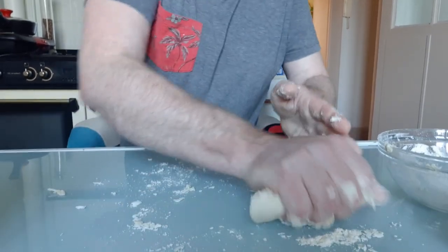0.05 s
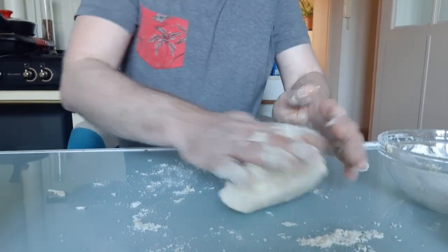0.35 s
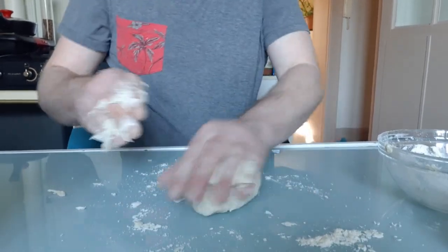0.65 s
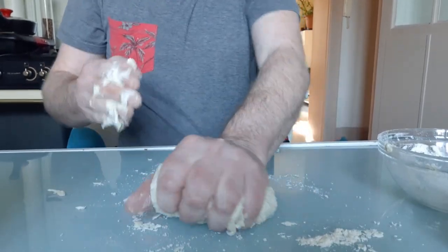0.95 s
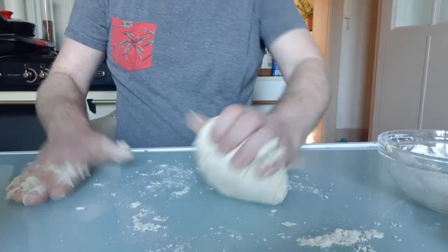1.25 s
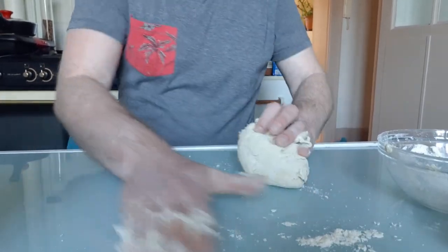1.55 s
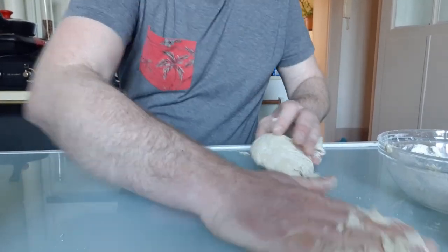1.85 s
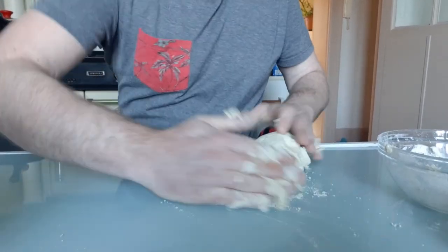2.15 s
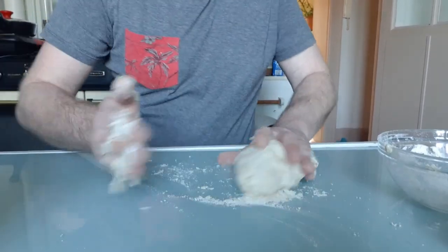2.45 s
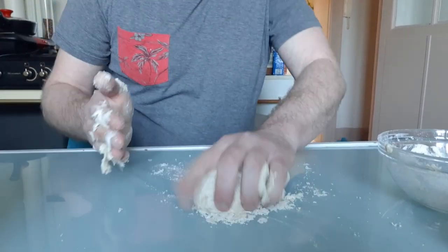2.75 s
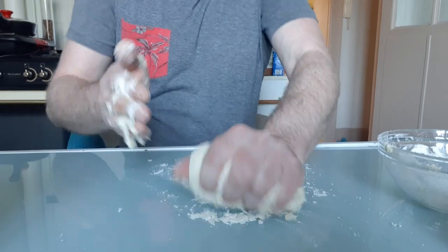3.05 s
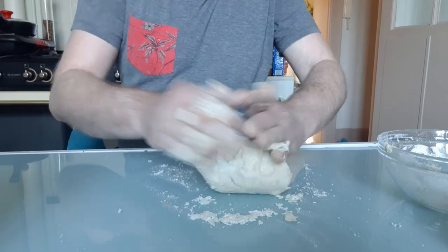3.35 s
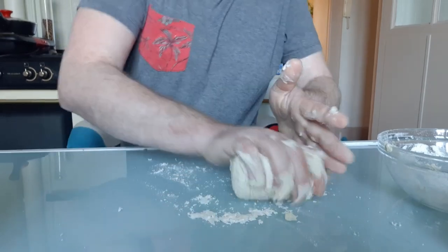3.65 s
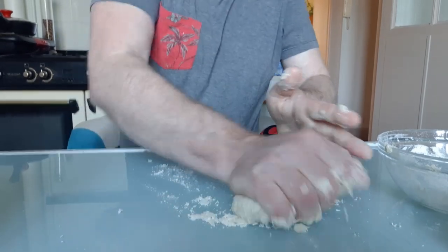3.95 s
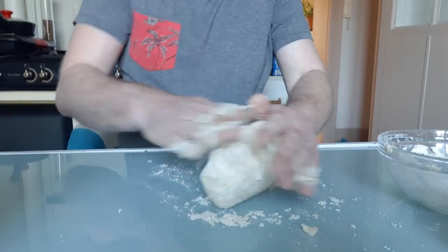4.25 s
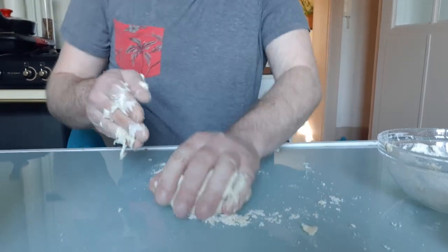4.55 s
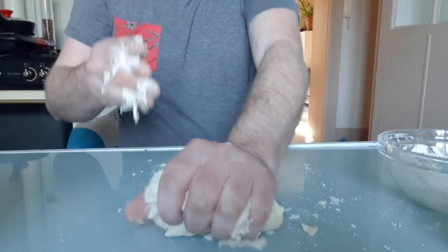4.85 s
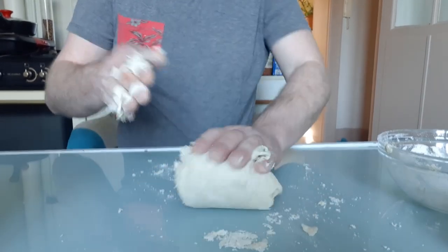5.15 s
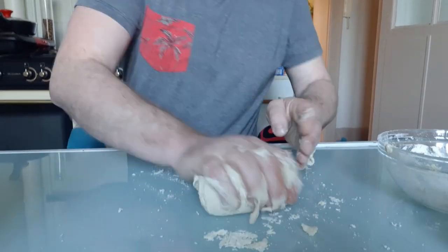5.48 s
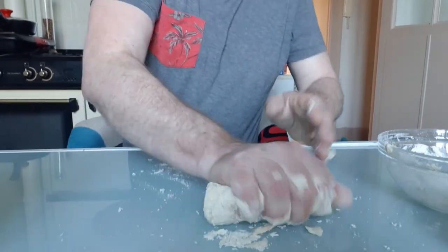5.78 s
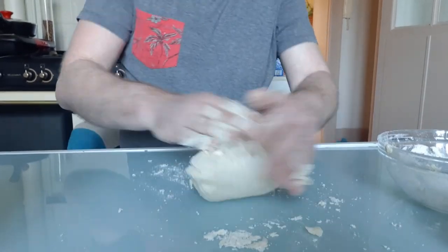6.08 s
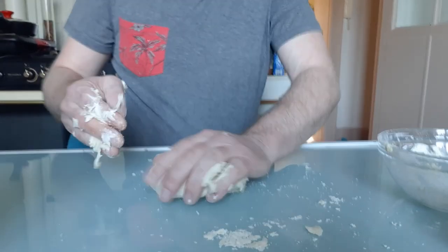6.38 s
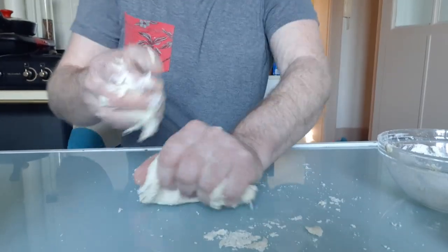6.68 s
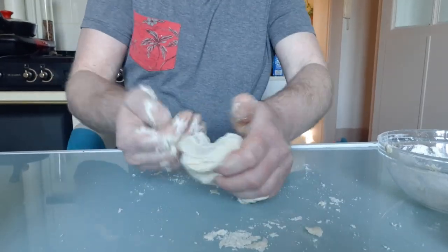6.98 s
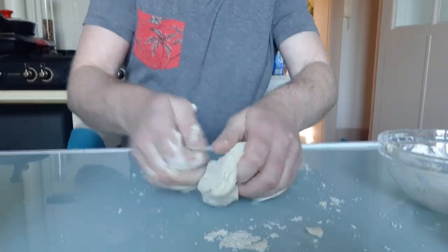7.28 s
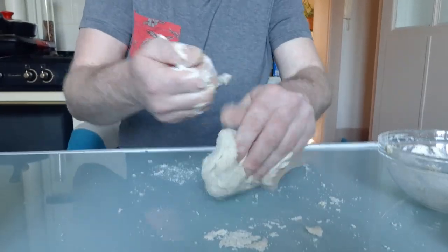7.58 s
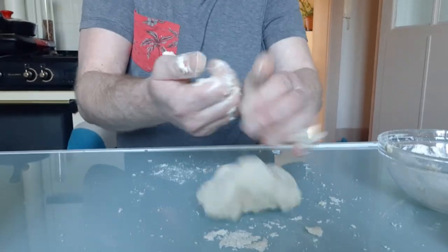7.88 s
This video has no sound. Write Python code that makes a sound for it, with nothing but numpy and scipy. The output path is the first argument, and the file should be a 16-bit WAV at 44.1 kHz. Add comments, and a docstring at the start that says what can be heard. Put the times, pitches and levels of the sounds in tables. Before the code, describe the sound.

In a small, slightly echoing kitchen with a low hum, dough is worked by hand on a glass table, heard in stereo with the bass leaning left. Soft pats and pressing give way to a faint hiss of swept flour. Firmer slaps, dull thuds and sticky peeling follow about once a second, with a few tiny squeaks of trapped air. A heavy slam, the loudest sound, comes near the end.

```python
"""Dough is kneaded by bare hands on a glass tabletop: palms slap, the lump thuds, peels and is rolled,
and near the end it is slammed down on a cushion of air. Each impact excites the pane's low, damped modes.
Friction makes the pressed lump murmur and loose flour hiss under a sweeping hand, and trapped air
squeaks out of a fold. The hard walls of a small kitchen reverberate, over a quiet room hum."""
import sys
import numpy as np
from scipy import signal
from scipy.fft import rfft, irfft, next_fast_len
from scipy.io import wavfile
from scipy.ndimage import map_coordinates

SR = 44100
rng = np.random.default_rng(int(sys.argv[2]) if len(sys.argv) > 2 else 0)


def digitize_waveform(pressure):
    """Quantize a signal to 16-bit integers and store it at the path in sys.argv[1].

    Rows of a 2-D input are taken as channels; values are limited to [-1, 1].
    """
    field = np.atleast_2d(pressure).T
    bounded = np.clip(field, -1, 1)
    quanta = np.round(bounded * 32767).astype(np.int16)
    wavfile.write(sys.argv[1], SR, quanta)


N = 353680

# Coherence of the left and right sound fields: frequency_hz, correlation
COHERENCE = [(60, 0.95), (150, 0.75), (300, 0.89), (550, 0.29), (1200, 0.15), (15000, 0.34)]
# Reverberation time of the kitchen: frequency_hz, t60_s
ROOM_DECAY = [(70, 0.6), (250, 0.55), (700, 0.34), (2400, 0.46), (5000, 0.34), (9000, .31), (15000, 0.31)]
# Spectra of room hum, flour hiss, palm rub and flesh meeting dough: frequency_hz, density_db
HUM_SPECTRUM = [(25, -27.5), (90, -1.5), (156, -9.5), (205, -5), (290, -0.5), (400, -14.5), (525, -7),
                (740, -10), (1020, -18.5), (1500, -27), (3000, -42), (4600, -35.5), (9000, -42),
                (15500, -38)]
FLOUR_SPECTRUM = [(1500, -21), (3500, -1.5), (5500, -1.5), (9000, 4), (13000, 9), (16000, -2.5)]
PALM_SPECTRUM = [(400, -3.5), (900, -8.5), (1700, -3.5), (4000, -3.5), (7500, -6), (10000, -22.5),
                 (14000, -12.5)]
SLAP_SPECTRUM = [(25, -17), (70, 0), (150, 0), (300, -3.5), (550, -3), (800, -0.5), (1500, -1.5),
                 (2500, -2), (4000, -1), (6300, -3), (9000, -8), (13000, -11.5), (16000, -19)]
# The dough slides on floury glass, and the hand leans on it: peak_s, length_s, level_db
DOUGH_SLIDES = [(.01, 0.13, -57.5), (.26, .4, -73.5), (.83, 0.17, -69.5), (3.17, 0.15, -66.5),
                (3.8, 0.59, -66), (4.03, 0.33, -67.5), (4.86, 0.37, -68.5), (5.35, 0.077, -71.5),
                (5.89, 0.37, -69.5), (6.27, 0.16, -71), (7.75, 0.27, -79.5)]
HAND_PRESSES = [(.14, 0.22, -45), (.42, 0.46, -45.5), (1.26, 0.48, -51), (1.82, 0.34, -43.5),
                (2.12, 0.44, -53), (2.46, 0.33, -49), (4.08, 0.36, -47), (5.92, 0.54, -46),
                (6.78, 0.44, -57)]
# The flat hand sweeps flour out and back, then gathers it: time_s, level_db
FLOUR_SWEEP = [(1.28, -91), (1.344, -69.5), (1.52, -55.5), (1.836, -54.5), (1.898, -60), (2.02, -49.5),
               (2.176, -70.5), (2.29, -95), (2.324, -77), (2.534, -50), (2.584, -52.5), (2.65, -81)]
# Bending modes of the pane on its frame: pitch_hz, level_db, t60_s
PANE_MODES = [(59.6, -14, 0.37), (80.34, -3.5, 0.39), (111.7, 0, 0.24), (130.7, -5.5, 0.2),
              (154.4, -8.5, 0.36), (207.3, -5, 0.51), (236.6, -9, 0.29), (277, -13.5, 0.77),
              (297.2, -2.5, 0.25), (343.6, -11.5, 0.24), (373, -22, 0.11), (405.4, -18.5, 0.46),
              (479.8, -6.5, 0.32), (536.3, -1.5, 0.34), (602.5, -7.5, 0.215), (727, -16.5, 0.15),
              (812, -8.5, .3), (987, -31.5, .3), (1127, -15.5, 0.29), (1550, -21, 0.18)]
# The table's bass is stronger on the left: frequency_hz, left_minus_right_db
TABLE_BALANCE = [(40, -1.5), (75, 10), (120, 5), (230, 1.5), (1000, 0)]
# Palm slaps, thuds of the lump, and gentle lifts or landings: start_s, level_db, spot_hz
# (spot_hz is the frequency at which the pane yields most under the point of contact)
PALM_SLAPS = [(.3702, -32, 208), (.6481, -40.5, 208), (2.689, -26.5, 227), (2.731, -21.5, 78.6),
              (3.219, -37, 204), (3.557, -26.5, 244), (3.5924, -27.5, 232), (4.965, -38, 250),
              (5.105, -34, 218), (5.464, -27.5, 244), (5.564, -25, 293), (6.295, -18.5, 131),
              (6.346, -14.5, 82), (7.1703, -25, 113.6), (7.1754, -10, 112), (7.187, -12, 113),
              (7.2022, -16.5, 108)]
LUMP_THUDS = [(.079, -56, 229), (.7564, -56, 134), (2.8157, -38, 204), (2.853, -50.5, 125),
              (3.109, -61, 198), (3.664, -27.5, 298), (3.691, -35, 298), (4.525, -45, 550),
              (4.566, -43.5, 152), (5.5347, -37.5, 140), (6.3805, -38, 82.7), (6.4597, -41.5, 113),
              (7.178, -28, 135), (7.3795, -54, 210)]
LUMP_NUDGES = [(1.305, -68, 81), (2.303, -71.5, 104)]
# Sticky dough peels off skin or glass: start_s, level_db
DOUGH_PEELS = [(.174, -40), (0.965, -64), (1.056, -40.5), (3.031, -41), (3.765, -34.5), (3.958, -39.5),
               (4.869, -40), (6.7, -45.5)]
# The four bands of a contact's force spectrum: thud_hz, pat_hz, smack_hz, fizz_hz
BANDS_HZ = [130, 420, 2400, 10000]
# Timbre of each kind of contact in those bands: thud_db, pat_db, smack_db, fizz_db
SLAP_TIMBRE = [-8.5, -9, 0, -29]
THUD_TIMBRE = [-5, 3, 0.5, -28.5]
PEEL_TIMBRE = [-16.5, -10, 0.5, -14.5]
NUDGE_TIMBRE = [1, 0.5, -2, -4]
# Air squeezed out of a fold: start_s, length_s, pitch_hz, bandwidth_hz, level_db
FOLD_SQUEAKS = [(3.763, 0.023, 860, 350, -36), (5.5, .12, 2260, 800, -41), (5.558, 0.041, 833, 131, -35)]
# Air displaced by the falling lump at the slam: centre_s, frequency_hz, level_db
AIR_PUFFS = [(7.167, 237, -12.5), (7.173, 200.7, -20)]


def amp(db):
    """Amplitude ratio of a level in decibels."""
    return 10 ** (np.asarray(db) / 20)


def unit(x):
    """The signal normalised to rms 1."""
    return x / np.sqrt(np.mean(x ** 2) + 1e-20)


def along(points, hz):
    """Interpolation of (frequency_hz, value) points on a logarithmic frequency axis."""
    knots_hz, values = np.transpose(points)
    return np.interp(np.log(hz + 1), np.log(knots_hz + 1), values)


def wobble(rate_hz):
    """Smooth random modulation: a spline through Gaussian knots."""
    knots = rng.standard_normal(int(N * rate_hz / SR) + 4)
    return map_coordinates(knots, [np.arange(N) * rate_hz / SR])


def filtered(x, response):
    """Linear filtering: the spectrum is multiplied by a frequency response."""
    n = x.shape[-1]
    padded = next_fast_len(n + 8192)
    return irfft(rfft(x, padded) * response(np.fft.rfftfreq(padded, 1 / SR)), padded)[..., :n]


def noise(n, spectrum_db):
    """Partially coherent stereo noise: the channels are alike in the bass, much less so in the treble."""
    def mid_side_gains(hz):
        angle = np.arccos(np.clip(along(COHERENCE, hz), -1, 1)) / 2
        return amp(spectrum_db(hz)) * [np.cos(angle), np.sin(angle)]
    mid, side = filtered(rng.standard_normal((2, n)), mid_side_gains)
    return np.array([mid + side, mid - side])


def steady_noise(spectrum):
    """Stationary stereo noise of rms 1 with a tabulated spectrum."""
    return unit(noise(N, lambda hz: along(spectrum, hz)))


def add(track, start_s, sound):
    """Superposition of a sound on the track."""
    part = track[:, max(round(start_s * SR), 0):][:, :sound.shape[-1]]
    part += sound[..., :part.shape[1]]


def strokes(rows, swell_share=0.61):
    """Envelope of strokes that swell and fade; incoherent sounds add in power."""
    t, power = np.arange(N) / SR, np.zeros(N)
    for peak_s, length_s, db in rows:
        start_s = peak_s - swell_share * length_s
        ramp = np.interp(t, [start_s, peak_s, start_s + length_s], [0, 1, 0])
        speed = np.sin(np.pi / 2 * ramp) ** 2
        power += (amp(db) * speed) ** 2
    return np.sqrt(power)


def reverberate(x, wet_db, build_s=0.0013):
    """Reverberation: diffuse reflections build up quickly, then decay at a different rate in each band."""
    hz, t, bands = signal.stft(noise(SR * 2 // 3, np.zeros_like), SR, nperseg=256)
    decay = amp(-60 * t / along(ROOM_DECAY, hz)[:, None])
    tail = signal.istft(bands * decay * (1 - np.exp(-t / build_s)), SR, nperseg=256)[1]
    tail = tail / np.linalg.norm(tail[0])
    return x + amp(wet_db) * signal.fftconvolve(x, tail, axes=1)[:, :x.shape[1]]


def room_hum(level_db=-54):
    """Ambient noise: a stationary hum with most of its power at low frequencies."""
    return amp(level_db) * steady_noise(HUM_SPECTRUM)


def flour_friction(sweep_db=1, rub_db=-54, brisk_db=-57, rub_exponent=0.77):
    """Granular friction: flour hisses in tiny bursts; the palm's duller rub grows more slowly with speed."""
    time_s, level_db = np.transpose(FLOUR_SWEEP)
    sweep = amp(sweep_db + np.interp(np.arange(N) / SR, time_s, level_db, left=-np.inf, right=-np.inf))
    motion = sweep + strokes(DOUGH_SLIDES)
    hiss = steady_noise(FLOUR_SPECTRUM) * motion
    rub = steady_noise(PALM_SPECTRUM) * (motion / amp(brisk_db)) ** rub_exponent * amp(rub_db)
    grit = unit(amp(2.4 * wobble(rate_hz=700) + 1.84 * wobble(rate_hz=28)))
    return reverberate(grit * (hiss + rub), wet_db=-0.5)


def pressing(lumpy_db=2, relative_half_width=0.035):
    """Stick-slip friction: the lump, rolled under the hand, drives the pane's low modes into a murmur."""
    def resonance_db(hz):
        power = sum(amp(2 * db) / (1 + ((hz / mode_hz - 1) / relative_half_width) ** 2)
                    for mode_hz, db, _ in PANE_MODES)
        return 10 * np.log10(power)
    # Spectrum of the friction force: frequency_hz, density_db
    drive = [(25, -1), (70, 5.5), (110, -3.5), (200, 2.5), (320, -4.5), (550, -9.5), (1200, -8),
             (4000, -6.5)]
    murmur = unit(noise(N, lambda hz: resonance_db(hz) + along(drive, hz)))
    return murmur * strokes(HAND_PRESSES) * amp(lumpy_db * wobble(rate_hz=24))


def contacts(peel_spot_hz=277):
    """Every impulsive excitation by hand or dough, as (start_s, level_db, spot_hz, timbre_db)."""
    peels = [(start_s, db, peel_spot_hz) for start_s, db in DOUGH_PEELS]
    kinds = [(PALM_SLAPS, SLAP_TIMBRE), (LUMP_THUDS, THUD_TIMBRE),
             (peels, PEEL_TIMBRE), (LUMP_NUDGES, NUDGE_TIMBRE)]
    return [(*row, timbre_db) for rows, timbre_db in kinds for row in rows]


def pane_ring(force_db, spot_hz, t, scatter_db=4.0, rise_s=0.0012, spot_db=8, spot_log_width=0.16):
    """Modal vibration: the glass rings as damped sinusoids whose strengths depend on where it is struck."""
    hz, mode_db, t60_s = np.transpose(PANE_MODES)[:, :, None]
    coupling_db = spot_db * np.exp(-(np.log(hz / spot_hz) / spot_log_width) ** 2)
    onset_db = force_db(hz) + mode_db + coupling_db + scatter_db * rng.standard_normal(hz.shape)
    spread_rad = np.minimum(hz / BANDS_HZ[1], 2)  # higher modes differ more in phase from left to right
    phase = spread_rad * rng.standard_normal((2, len(hz), 1))
    polarity = (-1) ** np.arange(len(hz))[:, None]
    modes = polarity * amp(onset_db - 60 * t / t60_s) * np.sin(2 * np.pi * hz * t + phase)
    return modes.sum(1) * (1 - np.exp(-t / rise_s))


def dough_smack(force_db, t, gain_db=20, crossover_hz=900, snap_s=0.0049, squash_s=0.014):
    """Inelastic impact: the surface gives a short wet smack, the soft lump a slower, duller squash."""
    burst = noise(len(t), lambda hz: force_db(hz) + along(SLAP_SPECTRUM, hz) + gain_db)
    lows = filtered(burst, lambda hz: 1 / (1 + (hz / crossover_hz) ** 2))
    smack = (burst - lows) * np.exp(-t / snap_s) * (1 - np.exp(-t / 0.0015))
    squash = lows * np.exp(-t / squash_s) * (1 - np.exp(-t / 0.0023))
    return reverberate(smack + squash, wet_db=1.5)


def impacts(smack_trim_db=-10, ring_db=-1.5, medium_db=-26.5, tilt_per_octave=0.13):
    """Impulsive excitation: one force spectrum drives both dough and pane; harder blows are brighter."""
    out, t = np.zeros((2, N)), np.arange(SR * 2 // 3) / SR
    octaves = np.log2(np.array(BANDS_HZ) / BANDS_HZ[2])
    for start_s, db, spot_hz, timbre_db in contacts():
        tilt_db = tilt_per_octave * (db - medium_db) * octaves
        thud, pat, smack, fizz = db + np.array(timbre_db) + tilt_db
        spectrum = list(zip(BANDS_HZ, [thud, pat, smack + smack_trim_db, fizz]))
        force_db = lambda hz: along(spectrum, hz)
        add(out, start_s, dough_smack(force_db, t) + amp(ring_db) * pane_ring(force_db, spot_hz, t))
    return out


def fold_squeaks():
    """Resonance: air escaping through a narrow fold sounds in a band around one pitch."""
    out = np.zeros((2, N))
    for start_s, length_s, pitch_hz, bandwidth_hz, db in FOLD_SQUEAKS:
        n = int(length_s * SR)
        air = unit(noise(n, lambda hz: -20 * np.log10(1 + (2 * (hz - pitch_hz) / bandwidth_hz) ** 2)))
        add(out, start_s, amp(db) * np.hanning(n) * air)
    return reverberate(out, wet_db=3.5)


def air_puffs(width_cycles=0.26):
    """Volume displacement: air driven from under the falling lump radiates a single swing of pressure."""
    out = np.zeros((2, N))
    for centre_s, hz, db in AIR_PUFFS:
        cycles = hz * (np.arange(N) / SR - centre_s)
        out += amp(db) * np.sin(2 * np.pi * cycles) * np.exp(-(cycles / width_cycles) ** 2 / 2)
    return reverberate(out, wet_db=-7)


def scene():
    """Superposition of the table's sounds, their bass leaning left, with flour, squeaks and hum."""
    balance = lambda hz: amp(np.outer([.5, -.5], along(TABLE_BALANCE, hz)))
    table = filtered(impacts() + air_puffs() + pressing(), balance)
    return table + flour_friction() + fold_squeaks() + room_hum()


def record(dry, low_hz=32, top_hz=15850):
    """Band limiting: a second-order high-pass thins the deepest bass, a steep low-pass ends the treble."""
    high_passed = filtered(dry, lambda hz: (1j * hz / (low_hz + 1j * hz)) ** 2)
    return filtered(high_passed, lambda hz: 1 / (1 + (hz / top_hz) ** 200))


dry = scene()
out = record(dry)
digitize_waveform(out)
```